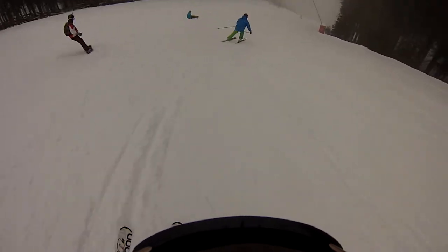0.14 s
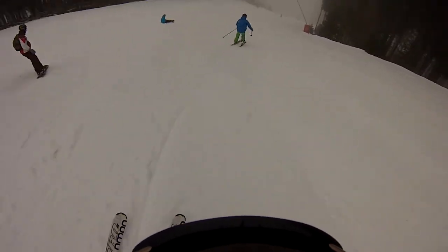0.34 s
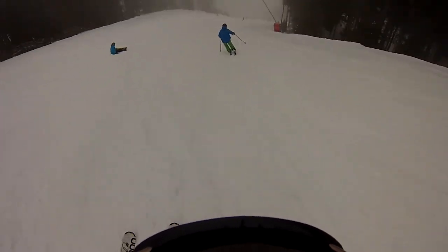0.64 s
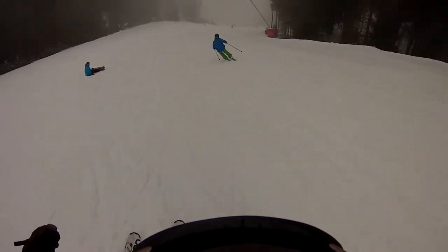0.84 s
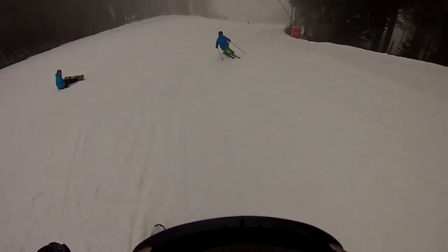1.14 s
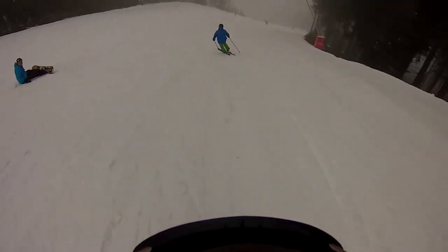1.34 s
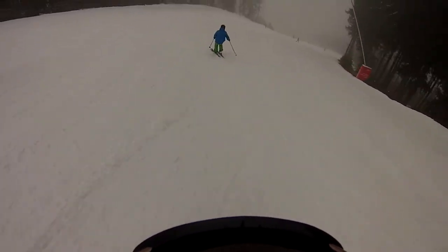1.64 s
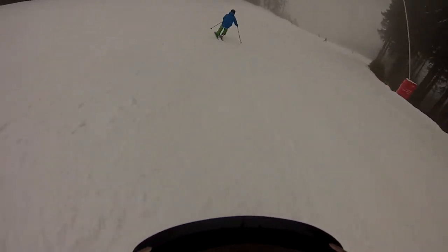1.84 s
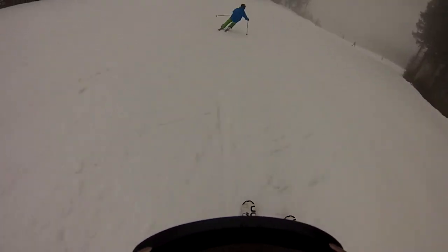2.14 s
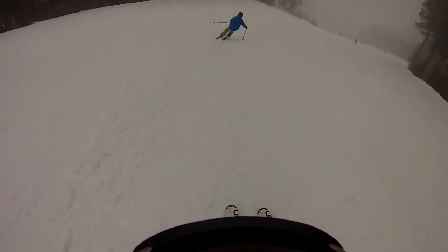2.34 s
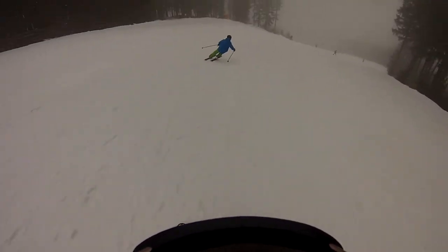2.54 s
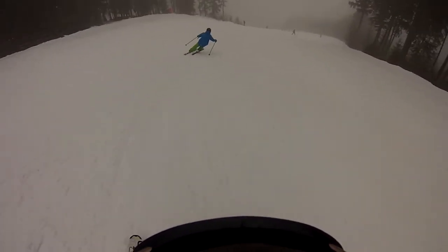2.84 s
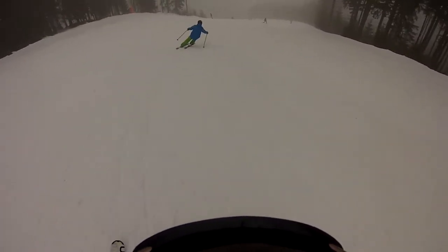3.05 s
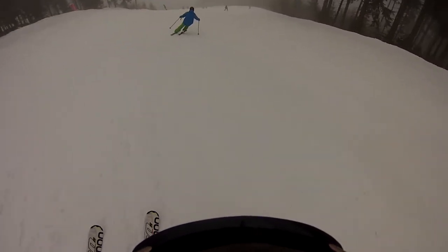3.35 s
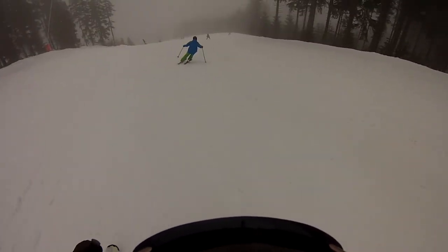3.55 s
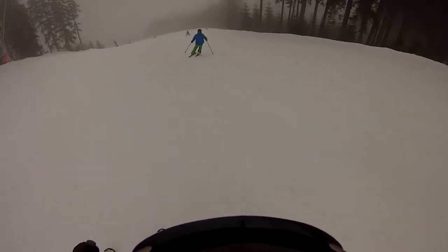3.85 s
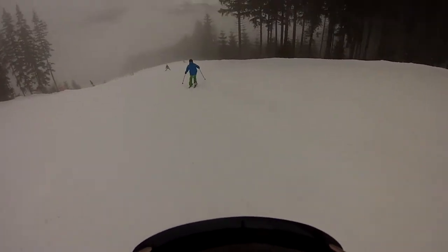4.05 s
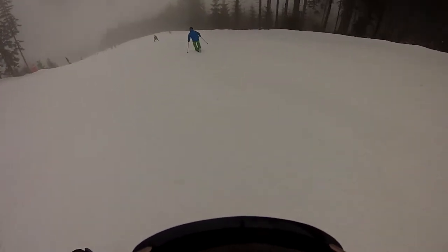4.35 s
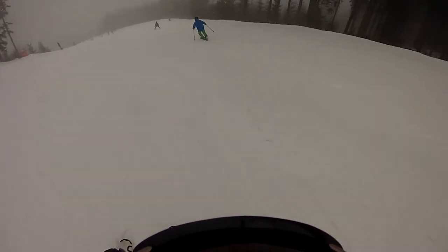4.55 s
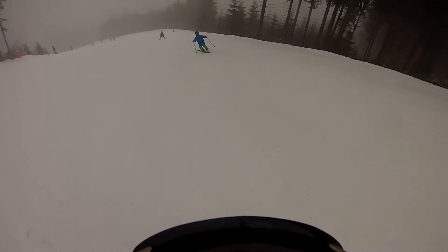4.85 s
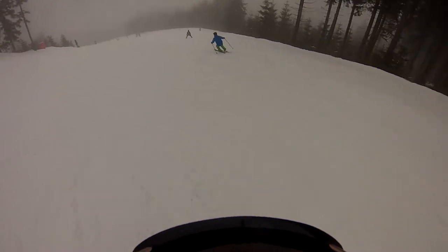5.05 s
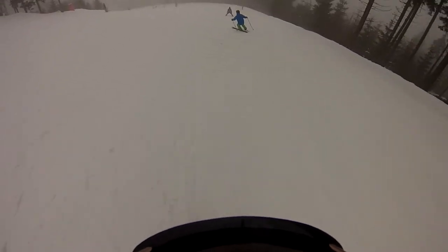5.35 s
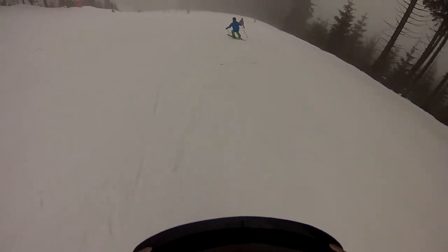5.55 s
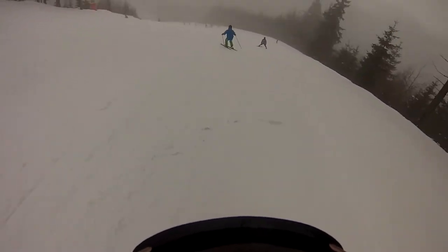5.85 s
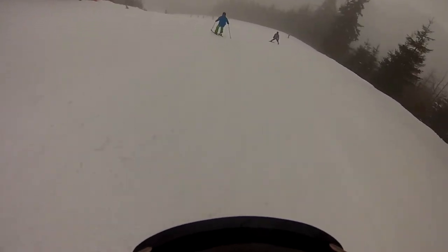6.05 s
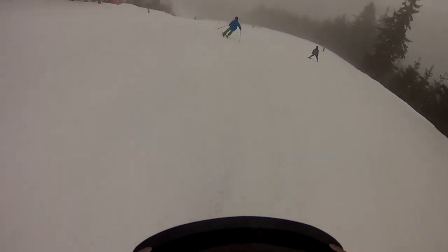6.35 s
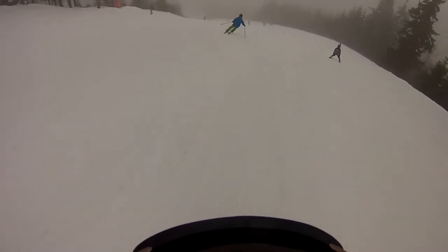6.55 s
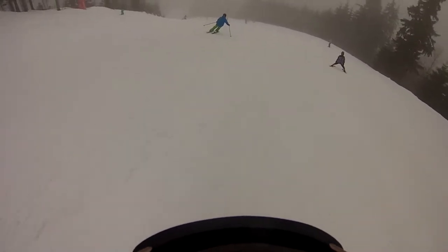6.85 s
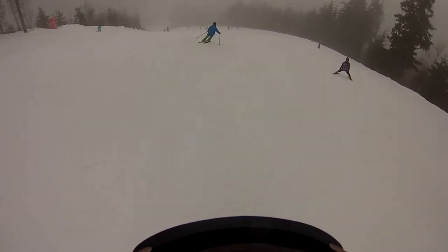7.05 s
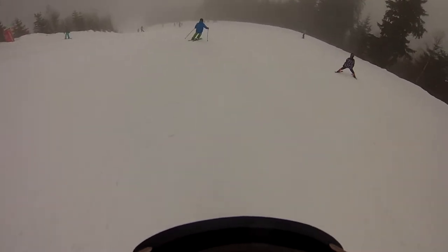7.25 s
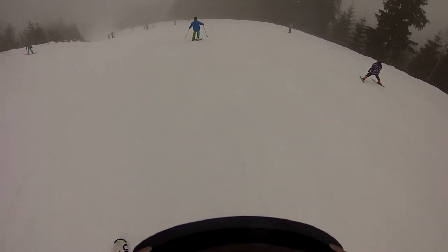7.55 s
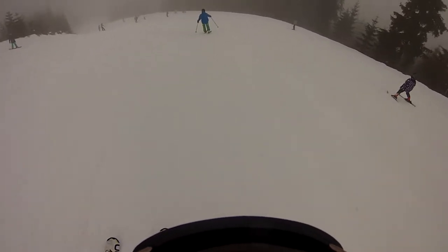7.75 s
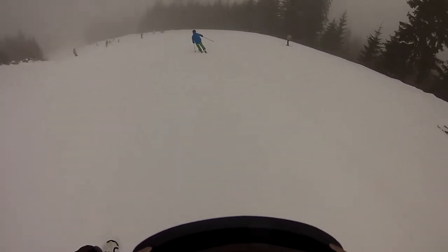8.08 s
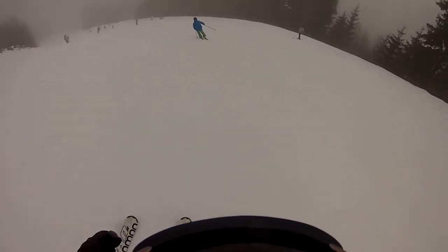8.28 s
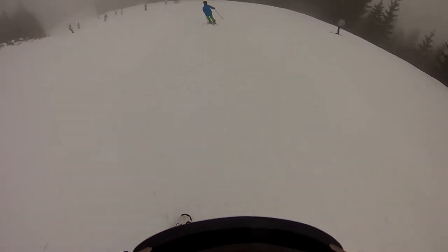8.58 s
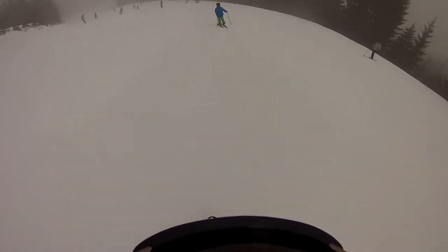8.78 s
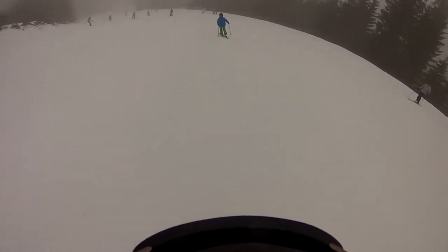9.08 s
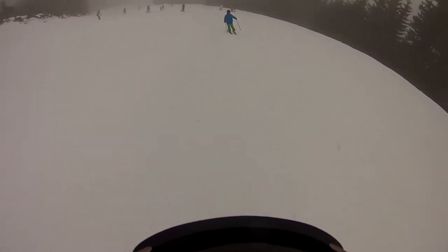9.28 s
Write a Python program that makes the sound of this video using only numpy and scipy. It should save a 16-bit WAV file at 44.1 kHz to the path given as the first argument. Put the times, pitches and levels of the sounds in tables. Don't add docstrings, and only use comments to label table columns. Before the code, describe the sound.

Deep, irregular wind buffets dominate a muffled downhill ski ride, with thin edge hiss and rushing air dipping after each blow.

```python
import sys
import numpy as np
from scipy import signal
from scipy.io import wavfile
from scipy.ndimage import uniform_filter1d

SR = 44100
rng = np.random.default_rng(int(sys.argv[2]) if len(sys.argv) > 2 else 0)


def volts(x):
    e = np.asarray(x, float) / 20
    return 10 ** e


def transcribe(signal):
    frames = np.atleast_2d(signal).T
    limited = np.clip(frames, -1, 1)
    pcm = np.round(limited * 32767).astype(np.int16)
    wavfile.write(sys.argv[1], SR, pcm)


N = 415422

# time in seconds, heard peak pressure (-1 to 1), forced gain drop in dB,
# depth of the suction just before (0 to 1).
BUFFETS = [(0.151, 0.3, 7.5, .26), (0.377, 0.36, 18.5, 0), (0.681, 0.35, 13, 0), (0.906, 0.019, 5, 0),
           (1.017, -0.27, 0.5, 0), (1.039, 0.31, 10.5, 0), (2.1, 0.29, 7, .32), (2.205, -0.2, 2, 0),
           (2.274, -0.26, 6, 0), (2.804, 0.3, 8, 0), (2.954, 0.29, 8, .29), (3.15, 0.31, 9, 0),
           (3.229, 0.29, 8.5, 0), (3.397, 0.34, 11, 0), (3.479, 0.28, 7, 0.29), (3.69, 0.32, 10, 0),
           (3.789, 0.3, 3.5, 0), (3.902, 0.28, 4.5, 0), (4.262, -0.28, 4, 0), (4.373, 0.4, 13.5, 0),
           (4.786, 0.41, 16.4, .26), (5.282, -0.28, 6, 0), (5.669, 0.3, 10, .34), (6.085, 0.29, 6.5, .28),
           (6.91, 0.25, 3.5, .29), (7.794, 0.27, 4.5, 0), (8.339, 0.29, 13.5, .33), (8.551, 0.29, 7, .27),
           (8.714, 0.28, 5.8, .33), (9.331, 0.32, 7.5, 0)]
# time in seconds, level in dB.
GUSTS = [(0.0, -16), (0.5, -3.5), (0.9, -19), (1.3, -14), (2.0, -15), (2.6, -18), (3.0, -15.5), (3.55, -11),
         (4.1, -21.5), (4.6, -8), (4.85, -20), (5.7, -18), (6.1, -9), (6.9, -18.5), (7.5, -21),
         (7.75, -6.5), (8.25, -18), (9.42, -13.5)]
# time in seconds, edge hiss level in dB.
SKI_LOAD = [(0.0, -32.5), (0.65, -33.5), (0.91, -37), (1.25, -33), (2.0, -33.5), (2.73, -34), (3.3, -38),
            (3.65, -36), (4.3, -38.5), (4.86, -34), (5.35, -37), (5.8, -34), (6.35, -33), (7.2, -36),
            (7.7, -35), (8.5, -34.5), (9.12, -37), (9.42, -33)]
# time in seconds, roar level in dB.
AIR_SPEED = [(0.0, -42), (0.35, -40.5), (0.9, -44.5), (1.3, -40.5), (2.3, -42.5), (2.75, -41.5),
             (3.3, -43.5), (3.95, -45), (4.55, -45), (4.9, -43), (5.45, -46.5), (5.8, -42), (6.4, -42.5),
             (7.0, -44), (7.4, -47), (7.8, -42), (8.3, -42), (9.42, -46.5)]
# start in seconds, length in seconds, level in dB.
SHAKES = [(0.24, 0.058, -24), (0.493, 0.031, -19), (0.634, 0.097, -18), (0.754, 0.2, -20.5),
          (1.11, 0.1, -21.5), (2.077, 0.089, -15), (2.476, 0.095, -20), (2.71, 0.052, -28),
          (3.011, 0.034, -24), (3.13, 0.061, -29), (3.386, 0.078, -16.5), (3.57, 0.25, -21),
          (4.254, 0.086, -23), (4.65, 0.091, -22.5), (6.88, 0.25, -25.5), (7.21, 0.32, -27),
          (8.267, 0.12, -23), (8.502, 0.31, -26), (8.746, 0.44, -24.5), (9.236, 0.11, -30)]
# start in seconds, length in seconds, level in dB.
HUMS = [(0.064, 0.098, -43), (0.814, 0.15, -37.5), (1.642, 0.15, -38.5), (2.365, 0.21, -46),
        (2.742, 0.051, -39), (2.888, 0.058, -47), (3.356, 0.13, -50), (3.615, 0.78, -42),
        (4.538, 0.051, -41), (4.773, 0.032, -47), (4.913, 0.14, -38), (6.258, 0.21, -43), (6.837, 0.3, -38),
        (7.266, 0.11, -43), (7.76, 0.55, -45), (8.261, 0.076, -50), (8.65, 0.045, -45), (8.958, 0.079, -35)]
# start in seconds, length in seconds, level in dB.
WHINES = [
    (.782, .036, -71),
    (6.477, .036, -69),
    (8.156, .036, -69),
]
WHINE_HZ = (10400, 11150)
# start in seconds, length in seconds.
TURNS = [
    (1.15, 1.5),
    (4.95, .7),
    (5.75, 1.35),
    (7.7, 1.4),
]
TURN_DB = (-49, -57, -51, -53.5)
# start in seconds, length in seconds, level in dB.
SEAM = [
    (2.8, 2.1, -62.5),
]
# frequency in Hz, width in Hz, lift in dB.
CASE = [(538, 72, 2.5), (764, 164, 8), (934, 31, 12.5), (1086, 77, -7), (1340, 42, 2), (1454, 390, -0.5),
        (2028, 22, 1), (2360, 167, 6.5), (2593, 120, 3.5), (3050, 93, 6), (3226, 130, 3), (4060, 86, -4.5),
        (3920, 380, 3.5), (4360, 140, 5), (4980, 550, 6), (5330, 120, 4), (5790, 170, 3), (6360, 580, 2.5),
        (12600, 360, -1)]
# frequency in Hz, level in dB per Hz.
RUMBLE = [(2, -2.5), (7, -3), (14, 6), (22, -8), (31, -13.5), (45, -31), (70, -27), (150, -77)]
# frequency in Hz, level in dB per Hz.
FLUTTER = [(25, -18), (55, 3.5), (75, -5.5), (100, -6), (170, -5.5), (300, -18), (600, -49.5)]
# frequency in Hz, level in dB per Hz.
ROAR = [(900, -27.5), (1800, 2.5), (2470, -1.5), (3450, -9), (3600, -13.5), (4940, -14), (5860, -18),
        (6770, -15.5), (9530, -31), (10600, -28.5), (12700, -40), (15500, -60)]
# frequency in Hz, level in dB per Hz.
EDGES = [(800, -38.5), (1050, -10.5), (1250, -4), (1530, 1.5), (1800, -10), (2600, -17), (3500, -23),
         (4700, -69)]
# frequency in Hz, level in dB per Hz.
BASES = [(120, -18), (250, -3), (400, -2.5), (650, -6), (900, -7.5), (1200, 0.5), (2000, -48)]
# frequency in Hz, level in dB per Hz.
SCRAPE = [(600, -43), (700, 6), (800, 7), (870, -26), (2700, -38), (2950, -14), (3400, 10), (3550, -40)]
# frequency in Hz, level in dB per Hz.
HISS = [(3000, -26), (7000, -8), (9000, -4), (12500, -6), (14500, -16), (15600, -40)]
# frequency in Hz, level in dB per Hz.
APART = [(20, 3), (53, 5), (238, 0), (900, -12), (2470, -21), (4950, -24), (9000, -27), (13900, -29),
         (15500, -34)]
# frequency in Hz, share (0 to 1).
EMPTY = [(11500, 0), (12500, .08), (13000, .2), (13500, .45), (14000, .3), (14500, .25), (14900, .3),
         (15150, .9), (15300, 1), (15700, 1)]


def evened(x):
    return x / np.sqrt(np.mean(x ** 2) + 1e-20)


def curve(rows, base_db, own_db, follows):
    time_s, db = np.transpose(rows)
    return volts(own_db + follows * (np.interp(np.arange(N) / SR, time_s, db) - base_db))


def bouts(rows, rest_db, swell_s=0.11):
    t = np.arange(N) / SR
    gain = volts(rest_db)
    for start_s, length_s, db in rows:
        inside_s = np.minimum(t - start_s, start_s + length_s - t)
        gain = gain + volts(db) * np.clip(inside_s / swell_s + .5, 0, 1)
    return gain


def resonate(x, hz, width_hz):
    turn = np.exp(2j * np.pi * hz * np.arange(len(x)) / SR)
    r = np.exp(-np.pi * width_hz / SR)
    return 2 * (turn * signal.lfilter([1 - r], [1, -r], x / turn)).real


def mode(hz, width_hz):
    once = resonate(rng.standard_normal(N), hz, width_hz)
    return evened(resonate(once, hz, width_hz))


def noise(spectrum, size, patchy_db, flicker_db):
    frames, hz = 4 * N // size + 5, np.fft.rfftfreq(size, 1 / SR)
    real, imag, patches = rng.standard_normal((frames, len(hz), 3)).T
    patches = uniform_filter1d(patches, size=12, axis=0)
    patches = evened(uniform_filter1d(patches, size=8, axis=1))
    flicker = evened(uniform_filter1d(rng.standard_normal(frames), size=3))
    spectrum_hz, level_db = np.transpose(spectrum)
    colour_db = np.interp(np.log(hz + 1), np.log(spectrum_hz + 1), level_db)
    for centre_hz, width_hz, lift_db in CASE:
        colour_db = colour_db + lift_db / (1 + (2 * (hz - centre_hz) / width_hz) ** 2)
    gain = volts(colour_db[:, None] + patchy_db * patches + flicker_db * flicker)
    z = (real + 1j * imag) * gain
    return evened(signal.istft(z, nperseg=size, noverlap=3 * size // 4)[1][:N])


def pushes():
    time_s, peak, drop_db, depth = np.transpose(BUFFETS)
    deep = depth > .1
    suction_s = time_s[deep] - .033
    suction_db = 46 * (depth[deep] - 0.23)
    drop_db = np.maximum(np.r_[drop_db, suction_db], 0)
    return np.r_[time_s, suction_s], np.r_[peak, -depth[deep]], drop_db


def at_buffets(shape, heights):
    train = np.zeros(N)
    train[np.round(pushes()[0] * SR).astype(int)] = heights
    return signal.oaconvolve(train, shape, "same")


def duck_db(fall_s=.017, lead_s=.006, climb_db_per_s=100):
    t = np.arange(-2000, 2001) / SR + lead_s
    fall = np.clip(1 - abs(2 * t / fall_s - 1), 0, 1)
    run_db = np.cumsum(at_buffets(fall / fall.sum(), pushes()[2]) - climb_db_per_s / SR)
    return run_db - np.minimum.accumulate(np.minimum(run_db, 0))


def slow_wind(ceiling=0.28):
    t = np.arange(-4000, 4001) / SR
    calm = np.clip(1 - .85 * at_buffets(np.exp(-(t / .016) ** 2), 1), 0, 1)
    wind = noise(RUMBLE, size=16384, patchy_db=0.5, flicker_db=1.0)
    wind = volts(-4.0) * curve(GUSTS, -10, -10, 0.73) * wind
    return ceiling * np.tanh(wind / ceiling) * calm


def buffets(rise_s=0.0063, tail_s=0.017):
    t = np.arange(-4000, 4001) / SR
    push = 1 / (1 + (t / np.where(t < 0, rise_s, tail_s)) ** 2) ** 1.1
    push = push - 0.35 * np.exp(-(t / 0.037) ** 2)
    return at_buffets(push / push.max(), pushes()[1]) * volts(duck_db())


def mount_shake():
    return volts(-3) * bouts(SHAKES, -31) * mode(45.98, 8.4)


def case_hum():
    return volts(-3) * bouts(HUMS, -50.5) * mode(122.96, 11.3)


def case_whistle():
    ringing = mode(1136.1, 29.3) + volts(-12) * mode(935.6, 30)
    return volts(-3) * curve(SKI_LOAD, -35, -45, 0.45) * ringing


def helmet_flutter():
    flutter = noise(FLUTTER, size=4096, patchy_db=2.0, flicker_db=2.0)
    return volts(-3) * curve(GUSTS, -10, -38, 0.1) * flutter


def roar():
    return volts(1.0) * curve(AIR_SPEED, 0, 0, 1) * noise(ROAR, size=1024, patchy_db=0.5, flicker_db=0.7)


def edge_shear():
    shear = noise(EDGES, size=1024, patchy_db=.7, flicker_db=.9)
    return volts(-2.5) * curve(SKI_LOAD, -35, -35, 1) * shear


def base_rush():
    rush = noise(BASES, size=2048, patchy_db=0.05, flicker_db=1.3)
    return volts(-2.5) * curve(SKI_LOAD, -35, -44.5, 0.86) * rush


def snow_scrape():
    rows = [(*turn, db) for turn, db in zip(TURNS, TURN_DB)]
    return bouts(rows, -69.5) * noise(SCRAPE, size=1024, patchy_db=1.5, flicker_db=1.0)


def seam_tone():
    return bouts(SEAM, -80) * mode(3800, 90)


def amplifier_hiss():
    return volts(-83.5) * noise(HISS, size=2048, patchy_db=2.5, flicker_db=3.2)


def stepped_duck_db(step_db=.8, jitter_db=.5, right_lag_s=.00016):
    duck = duck_db()
    wander = uniform_filter1d(rng.standard_normal(N), size=1500)
    wander = evened(uniform_filter1d(wander, size=1500))
    duck = duck + jitter_db * np.minimum(duck, 1) * wander
    steps = uniform_filter1d(step_db * np.round(duck / step_db), size=5)
    return np.array([steps, np.roll(steps, round(right_lag_s * SR))])


def channel_split():
    t = np.arange(-4000, 4001) / SR
    over = np.clip((abs(pushes()[1]) - .265) / 0.051, 0, 1)
    shape = np.exp(-(t / np.where(t < 0, .012, .04)) ** 2)
    working = np.clip(at_buffets(shape, over), 0, 1)
    apart = volts(-47) * working * noise(APART, size=512, patchy_db=3, flicker_db=2.5)
    return apart * np.array([[1], [-1]])


def ticks(length_s=0.005, repeat_s=.011, repeat_db=-8, spread_db=1.0, mean_gap_samples=36):
    time_s, peak, _ = pushes()
    time_s = time_s - .001
    luck = rng.standard_normal((len(time_s), 3))
    ducked_db = duck_db()[np.round((time_s - .008) * SR).astype(int)]
    tick_db = -48 - .7 * ducked_db - 200 * np.maximum(.33 - abs(peak), 0)
    t = np.arange(N) / SR
    bursts = np.zeros(N)
    for first_s, db, row in zip(time_s, tick_db, luck):
        for k, odd in enumerate(row):
            start_s = first_s + k * repeat_s
            on = (t > start_s) & (t < start_s + length_s)
            bursts += volts(db + k * repeat_db + spread_db * odd) * on
    clicks = .8 * rng.standard_normal(N) + .8 * rng.standard_normal((2, N))
    clicks = clicks * (.3 + (rng.random(N) < 1 / mean_gap_samples) * 3)
    clicks = signal.lfilter([1, -.35], [1], clicks)
    clicks = signal.lfilter(*signal.butter(6, 14300, fs=SR), clicks)
    return volts(-2.5) * bursts * clicks


def whines():
    t = np.arange(N) / SR
    on = sum(volts(db) * ((t > start_s) & (t < start_s + length_s)) for start_s, length_s, db in WHINES)
    return on * sum(evened(resonate(rng.standard_normal(N), hz, 120)) for hz in WHINE_HZ)


def drop_high_bands(x):
    hz, t, z = signal.stft(x, SR, nperseg=1024, noverlap=768)
    draw = rng.random((len(t) // 4 + 1, len(hz) // 6 + 1)).T
    draw = draw.repeat(6, 0).repeat(4, 1)[:len(hz), :len(t)]
    kept = draw > np.interp(hz, *np.transpose(EMPTY))[:, None]
    return signal.istft(z * kept, SR, nperseg=1024, noverlap=768)[1][:, :N]


def scene():
    wind = slow_wind() + buffets() + roar()
    moan = mount_shake() + case_hum() + case_whistle() + helmet_flutter()
    skis = edge_shear() + base_rush() + snow_scrape()
    mono = wind + moan + skis + seam_tone() + whines()
    return np.array([mono, mono])


def roll_off(x):
    return signal.sosfilt(signal.butter(12, 15740, fs=SR, output="sos"), x)


def record(dry):
    hiss = np.array([amplifier_hiss() for _ in dry])
    heard = dry * volts(-stepped_duck_db()) + hiss + channel_split()
    heard = .9 * np.tanh(heard / .9)
    heard = signal.lfilter(*signal.butter(1, 1.5, "high", fs=SR), heard)
    mix = drop_high_bands(heard) + ticks()
    return roll_off(mix)


dry = scene()
out = record(dry)
transcribe(out)
```